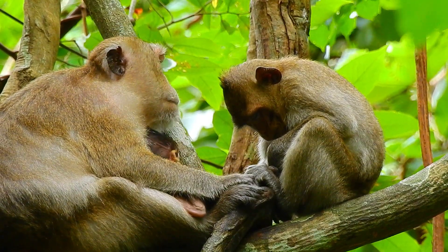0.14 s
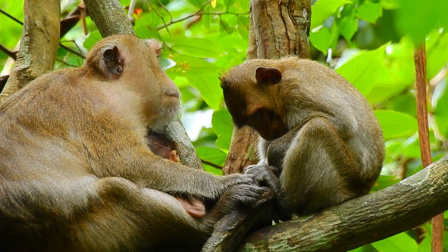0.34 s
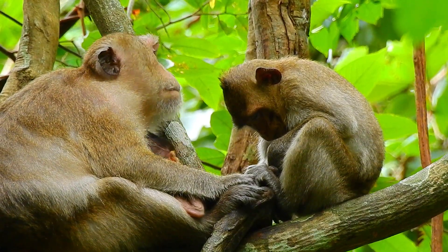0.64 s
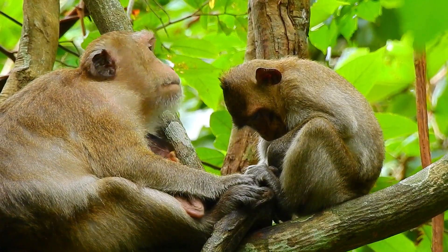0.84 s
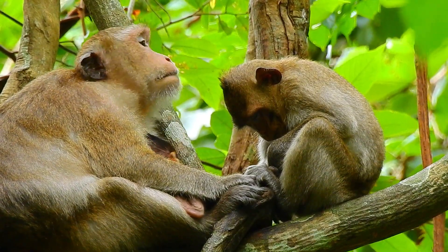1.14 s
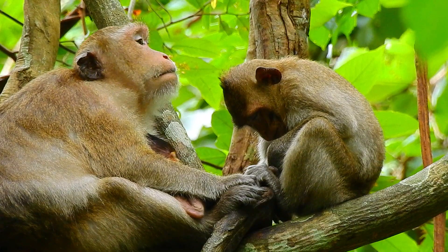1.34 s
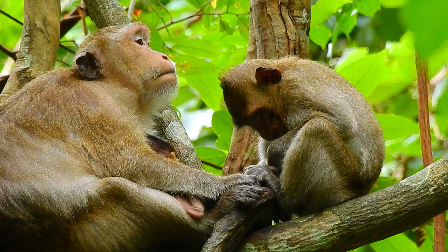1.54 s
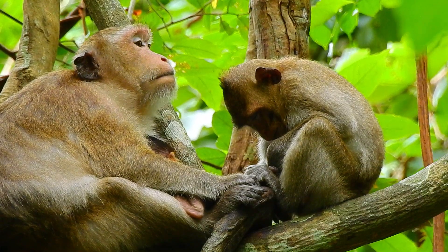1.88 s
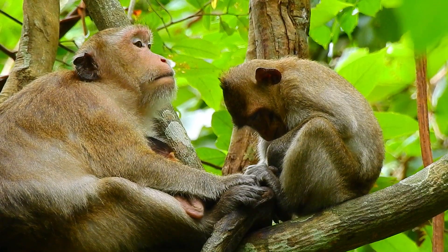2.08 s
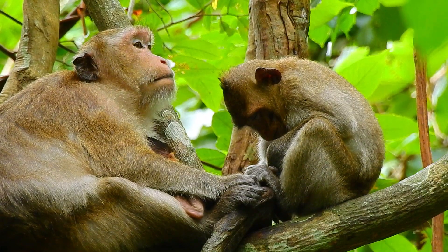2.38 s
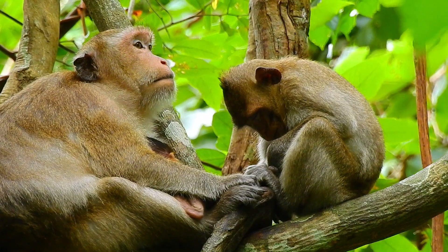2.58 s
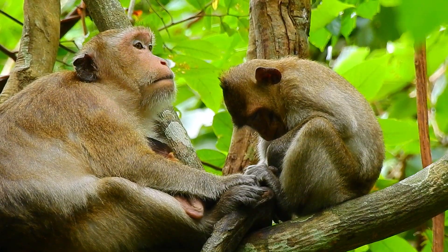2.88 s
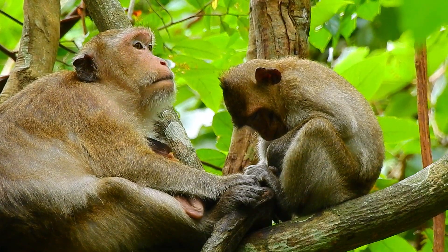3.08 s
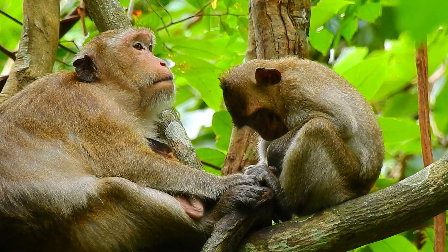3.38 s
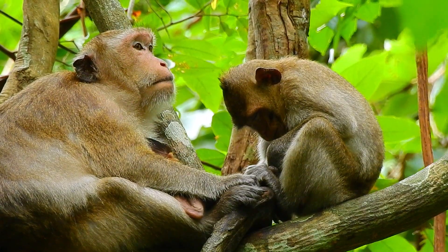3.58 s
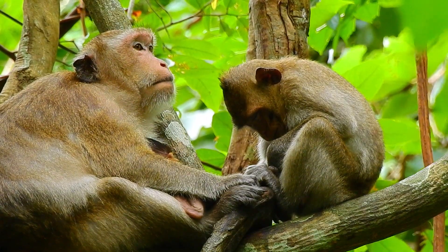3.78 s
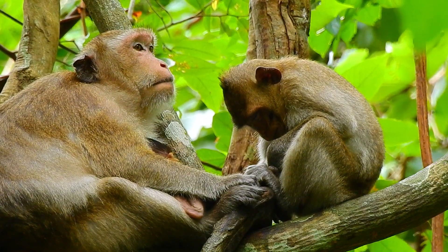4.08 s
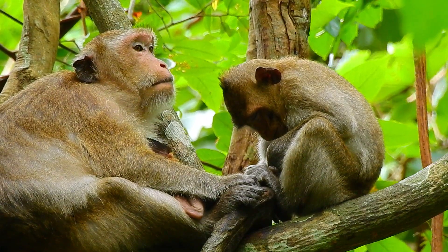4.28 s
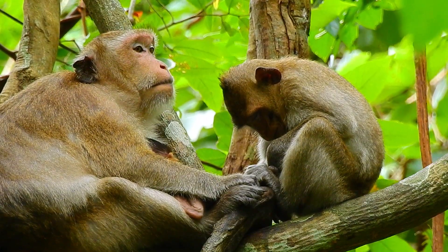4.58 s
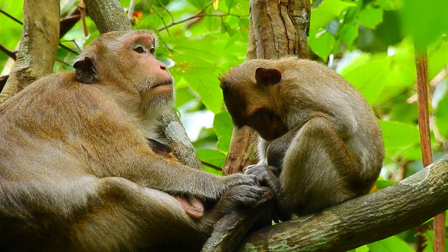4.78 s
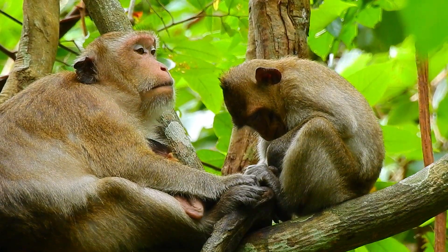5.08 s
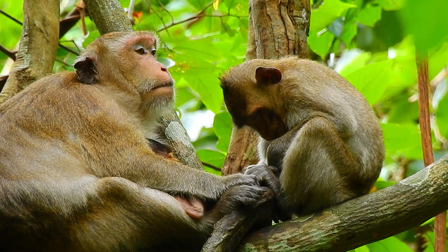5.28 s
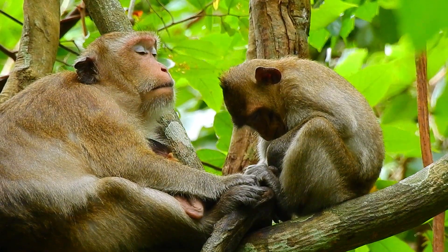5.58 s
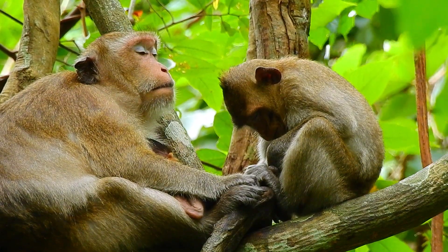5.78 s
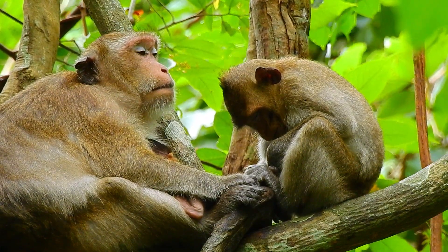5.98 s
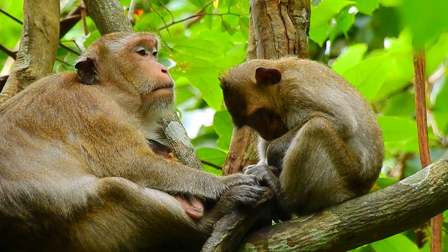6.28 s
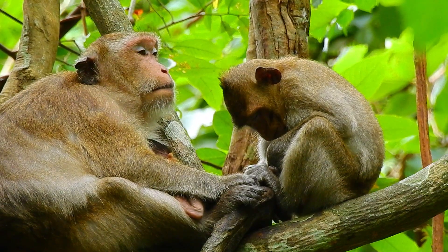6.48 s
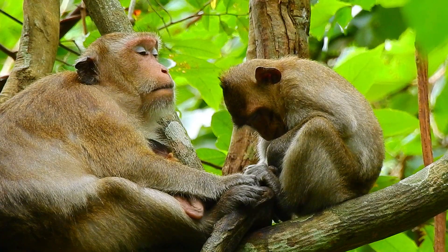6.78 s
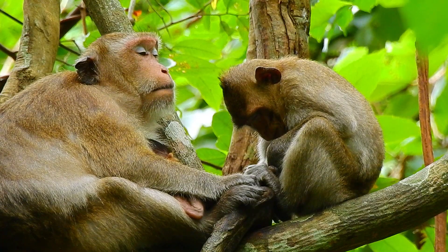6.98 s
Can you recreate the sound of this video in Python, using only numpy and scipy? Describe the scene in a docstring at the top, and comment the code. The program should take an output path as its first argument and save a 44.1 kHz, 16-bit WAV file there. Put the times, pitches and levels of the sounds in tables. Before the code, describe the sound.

Tropical forest ambience outdoors. Distant birds give soft, reverberant sliding whistles from the start, then sharp chips; a nearer bird follows with clear, quick arched notes. High insects drone steadily, a cricket repeats a long-short pulse, and a rough cicada buzz swells early, then cuts off midway. Tiny twig ticks and soft rustling puffs come and go above airy hiss and a low far rumble. Wide stereo microphone, birds slightly left.

```python
"""Birds whistle in a tropical forest: quick arched glides from a nearer one, short dry slides, others deeper in.
Each note is a sine on a gliding pitch path, smeared by noise-built echoes of trunks and leaves into a long tail.
Insects drone as noise in narrow bands, single crickets sing thin tones, a cicada's rough noise swells and stops.
Twigs tick, and soft puffs of noise pass, some rustling, some like insect bursts: both are shaped bursts of noise.
Airy hiss and a low far rumble lie under it all."""
import sys
import numpy as np
from scipy import signal
from scipy.fft import rfft, irfft
from scipy.io import wavfile
from scipy.ndimage import uniform_filter1d

SR = 44100
rng = np.random.default_rng(int(sys.argv[2]) if len(sys.argv) > 2 else 0)


def master(y):
    """Save y as 16-bit WAV."""
    cut = np.clip(np.atleast_2d(y).T, -1, 1)
    pcm = np.round(cut * 32767)  # scale
    wavfile.write(sys.argv[1], SR, pcm.astype(np.int16))


N = 314874   # samples in the scene
ROUND_LENGTH = 5 * 2 ** 16   # samples, a quick transform length
LEFT_RIGHT = np.array([[1], [-1]])   # opposite signs for the two sides


def amp(db):
    """Gain of a level in dB."""
    return 10 ** (np.asarray(db) / 20)


def rms_one(x):
    """Scaled to rms 1, over both sides together."""
    return x / np.sqrt(np.mean(x ** 2) + 1e-20)


def in_time(rows):
    """Columns of a time curve, read at every sample."""
    s, *columns = np.transpose(rows)
    return [np.interp(np.arange(N) / SR, s, c) for c in columns]


def at_hz(points, hz):
    """A spectrum read on a log-frequency axis."""
    point_hz, values = np.array(points).T
    return np.interp(np.log(hz), np.log(point_hz), values)


def drift(corner_hz):
    """Slow random wander of spread 1: noise through two equal low-pass poles, drawn every 40 samples."""
    pole = np.exp(-2 * np.pi * corner_hz * 40 / SR)
    noise = rng.standard_normal(N // 40 + 2002)
    slow = signal.lfilter([1], [1, -2 * pole, pole * pole], noise)[2000:]   # skip the filter's start
    return np.interp(np.arange(N) / 40, np.arange(len(slow)), rms_one(slow))


def widen(shared, opposed, alike):
    """Two sides from a shared and an opposed part; likeness 1 is mono, 0 is independent."""
    return np.sqrt(1 + alike) * shared + np.sqrt(1 - alike) * opposed * LEFT_RIGHT


def resonant(drive, hz, width_hz, lead=0., alike=.5):
    """Spectra of two drives through a doubled resonance: one straight, one scattered, the left leading in phase."""
    bin_hz = np.linspace(0, SR / 2, drive.shape[1])
    shape = 1 / (1 + (2 * (bin_hz - hz) / width_hz) ** 2)
    straight, scattered = drive * shape
    turn = np.exp(.5j * lead * LEFT_RIGHT)
    return rms_one(irfft(widen(straight, scattered, np.clip(alike, 0, 1)) * turn))


# how alike left and right are in the hiss and rumble: (frequency [Hz], likeness [0-1])
SIDE_LIKENESS = [(60, 1), (160, 0.97), (300, 0.54), (700, 0.42), (2500, 0.39), (8000, 0.089), (13000, 0.91)]


def coloured(spectrum):
    """Stereo noise with a given spectrum shape; rms 1."""
    hz = np.maximum(np.fft.rfftfreq(N, 1 / SR), 1)
    mid, side = rfft(rng.standard_normal((2, N))) * amp(at_hz(spectrum, hz))
    alike = np.clip(at_hz(SIDE_LIKENESS, hz), -1, 1)
    return rms_one(irfft(widen(mid, side, alike), N))


# low far rumble: (frequency [Hz], relative level per Hz [dB])
RUMBLE_SPECTRUM = [(12, -60), (20, -38.5), (59, -1.5), (86, 1.5), (144, -4), (197, -12), (253, -26),
                   (300, -34.5), (390, -36), (660, -120)]


def rumble():
    """A low far rumble: steady noise shaped by its spectrum."""
    return amp(-35.5) * coloured(RUMBLE_SPECTRUM)


def patchy(x, patchy_db):
    """Each broad band of a hiss swells and sinks on its own."""
    edges_hz = [0, 250, 550, 1200, 2500, 5500, 11700, SR]
    hz, spectrum = np.fft.rfftfreq(ROUND_LENGTH, 1 / SR), rfft(x, ROUND_LENGTH)
    out = 0
    for low, high in zip(edges_hz, edges_hz[1:]):
        band = irfft(spectrum * ((hz >= low) & (hz < high)))[:, :N]
        out = out + amp(patchy_db * (drift(1.0) + drift(4.9))) * band
    return out


# forest hiss: (frequency [Hz], relative level per Hz [dB])
AIR_SPECTRUM = [(150, -30), (250, -12.5), (420, -17), (800, -18), (1400, -22.5), (2600, -20.5), (3100, -22),
                (3650, -25), (4200, -21.5), (5600, -23), (7500, -24), (9200, -29.5), (11500, -36),
                (12500, -43), (14800, -41.5), (15500, -60)]


def air():
    """Forest hiss: shaped noise whose bands breathe independently."""
    return amp(-49.5) * patchy(coloured(AIR_SPECTRUM), patchy_db=.9)


def singer(white, hz, width_hz, rate, depth, lead, alike):
    """Many far singers blur into throbbing noise in a narrow resonance."""
    throb = 1 + depth * np.sin(2 * np.pi * rate * np.arange(N) / SR + drift(1.5))
    return throb * resonant(white, hz, width_hz, lead, alike)[:, :N]


# steady insects: (centre [Hz], width [Hz], mid level [dB], throb rate [per s], throb depth [0-1],
# level waver [dB], left lead [rad], likeness [0-1])
DRONE_VOICES = [(4855, 138, -52, 10, 0, -1.5, 0, 0.86), (5205, 1300, -52.5, 60, 0, 2.5, 2, 0.23),
                (10820, 100, -67, 9, 0, -5, -2.5, 1), (997, 30, -65.5, 9.1, 0.1, 4, -5.5, 1),
                (804, 63, -66, 27, 0.02, 2.5, 0.14, 1)]


def insect_drone(white):
    """Steady insects: narrow noise bands that waver in level."""
    out = 0
    for hz, width, level_db, rate, depth, waver_db, lead, alike in DRONE_VOICES:
        level = amp(level_db + waver_db * drift(4.1))
        out = out + level * singer(white, hz, width, rate, depth, lead, alike)
    return out


# loose phrases of two crickets that sink at the end: (time [s], low voice level [dB], high voice level [dB])
PHRASE_LEVELS = [(0.0, -55.5, -66), (1.2, -59, -65), (1.9, -53, -64.5), (2.4, -57.5, -63),
                 (3.5, -58.5, -64), (5.3, -60, -64.5), (6.0, -58, -66), (6.4, -65, -72), (7.14, -78, -78)]
# their voices: (centre [Hz], width [Hz], throb rate [per s], throb depth [0-1], left lead [rad])
PHRASE_SINGERS = [(2868, 57, 13, 0.14, 0.48), (11420, 220, 9, 0.03, -1.86)]


def phrasing_crickets(white):
    """Two throbbing noise bands whose levels follow loose phrases."""
    out = 0
    for (hz, width, rate, depth, lead), level_db in zip(PHRASE_SINGERS, in_time(PHRASE_LEVELS)):
        level = amp(level_db - 0.5 * drift(10))
        out = out + level * singer(white, hz, width, rate, depth, lead, 1.0)
    return out


# high crickets, both joining late and the lower one leaving: (time [s], lower level [dB], upper level [dB])
HIGH_CRICKETS = [(0, -92, -89), (.5, -82, -82), (.75, -67, -78), (3.2, -60, -63), (3.749, -64, -65),
                 (4.05, -56, -62), (4.75, -64, -60), (5.2, -98, -59.5), (7.14, -87, -60)]


def high_crickets(white):
    """Two high noise bands that join late, throbbing gently."""
    out = 0
    for hz, level_db, width, lead in zip((7700, 8270), in_time(HIGH_CRICKETS), (80, 170), (.3, 1.3)):
        out = out + amp(level_db) * singer(white, hz, width, 3.9, 0.089, lead, 0.048)
    return out


def insects():
    """The blurred insect chorus: every band rings from the same pair of noises."""
    white = rfft(rng.standard_normal((2, ROUND_LENGTH)))
    return insect_drone(white) + phrasing_crickets(white) + high_crickets(white)


# long and short note of the regular cricket, timed within each bar: (time [s], length [s], level [dB])
CRICKET_BAR = [(0, 0.258, -58), (0.295, 0.1, -58.5)]
BAR_START_S, BAR_S, BAR_HZ = .055, .624, 5762


def regular_cricket():
    """One thin tone, gated in a repeating bar, wavering in level and pitch."""
    in_bar = (np.arange(N) / SR - BAR_START_S) % BAR_S
    gate = 0
    for s, length, db in CRICKET_BAR:
        gate = gate + amp(db) * np.clip(np.minimum(in_bar - s, s + length - in_bar) / 0.014, 0, 1)   # 14 ms edges
    phase = 2 * np.pi * np.cumsum(BAR_HZ + 8 * drift(6.63)) / SR
    return np.sqrt(2) * gate * amp(2.1 * drift(13.0)) * np.sin(phase)


# short chirps of another cricket: (time [s], level [dB] before panning)
CRICKET_CHIRPS = [(4.26, -53), (4.92, -59), (5.07, -59), (5.234, -51), (5.389, -56), (6.27, -60),
                  (6.42, -55), (6.56, -62), (6.695, -55), (6.9, -53)]
CHIRP_HZ, CHIRP_S = 5270, 0.097


def chirping_cricket():
    """One thin tone in rounded chirps, louder on the left."""
    t = np.arange(N) / SR
    swell = sum(amp(db) * np.sin(np.pi * np.clip((t - s) / CHIRP_S, 0, 1)) for s, db in CRICKET_CHIRPS)
    return np.sqrt(2) * swell * np.sin(2 * np.pi * CHIRP_HZ * t) * amp(1.5 * LEFT_RIGHT)


# the cicada's swell and stop: (time [s], level [dB])
CICADA_SWELL = [(1.2, -61), (1.5, -47.5), (1.75, -44), (2.07, -41), (3.16, -41), (3.46, -43), (3.56, -48),
                (3.7, -78)]
CICADA_HZ, CICADA_WIDTH_HZ, CICADA_CLICKS_PER_S = 5140, 620, 150   # the click rate wanders about its mean


def cicada():
    """Membrane clicks, a shallow pulsing in the noise, ring the hollow body."""
    cycle = np.cumsum(CICADA_CLICKS_PER_S * (1 + 0.3 * drift(7.5))) / SR % 1
    bursts = (3.4 + np.exp(-cycle / 1.2)) * rng.standard_normal((2, N))
    return amp(in_time(CICADA_SWELL)[0]) * resonant(rfft(bursts), CICADA_HZ, CICADA_WIDTH_HZ, 0.56, 0.54)


# soft noise puffs: (time [s], length [s], centre [Hz], width [Hz], level [dB] before the puff envelope)
NOISE_PUFFS = [(3.945, 0.55, 6150, 1980, -47), (4.214, 0.69, 4270, 1700, -49),
               (4.205, 0.24, 2300, 700, -46), (4.269, 0.26, 9960, 1210, -57),
               (4.518, 0.28, 9900, 1200, -56), (5.378, 0.072, 10600, 800, -62),
               (6.106, 0.2, 7100, 1500, -59), (5.149, 0.65, 5200, 400, -54.5),
               (6.595, 0.068, 12000, 3000, -56)]


def soft_puffs():
    """Soft puffs of noise that rise fast and fade, some perhaps insect bursts, some rustling."""
    out = np.zeros((2, N))
    for s, length, hz, width, level_db in NOISE_PUFFS:
        i, size = round(s * SR), round(length * SR)
        puff = np.sin(np.pi * (np.arange(size) / size) ** 0.39)
        noise = resonant(rfft(rng.standard_normal((2, 32768))), hz, width, alike=.6)
        out[:, i:i + size] += amp(level_db) * puff * noise[:, :size]
    return out


# twig ticks: (time [s], level [dB] before the snap envelope, centre [Hz])
TWIG_TICKS = [(2.429, -31, 7000), (2.631, -35, 5940), (2.728, -33, 6900), (3.114, -33, 6900),
              (3.459, -35, 7000), (3.819, -60, 7100), (4.531, -27, 6400), (4.704, -28, 6000)]


def ticks():
    """Each tick is a snap of noise a few milliseconds long in a wide resonance."""
    out, t = np.zeros((2, N)), np.arange(1024) / SR
    envelope = np.exp(-t / .0018) * np.minimum(t / .001, 1)
    for s, level_db, hz in TWIG_TICKS:
        i = round(s * SR)
        snap = resonant(rfft(rng.standard_normal((2, len(t)))), hz, 1800, alike=0.11)
        out[:, i:i + len(t)] += amp(level_db) * snap * envelope
    return out


WARBLE_HZ = 37.6   # rate of the pitch shake


def whistle(notes, shakes=None, under_db=-99., edge_s=0.0023):
    """Sine notes on rounded pitch paths of (time, Hz, dB) points, with soft edges."""
    out, waver = np.zeros(N), 1 + .005 * drift(40)   # no pitch is held quite still
    for note, shake in zip(notes, shakes or [0] * len(notes)):
        s, hz, level_db = np.transpose(note)
        i = np.arange(round(s[0] * SR), round(s[-1] * SR))
        t = i / SR
        pitch = uniform_filter1d(np.interp(t, s, hz), size=400, mode="nearest")   # a throat turns corners smoothly
        pitch = pitch * waver[i] * (1 + shake * np.sin(2 * np.pi * WARBLE_HZ * (t - s[0])))
        phase = 2 * np.pi * np.cumsum(pitch) / SR
        edge = np.clip(np.minimum(t - s[0], s[-1] - t) / edge_s, 0, 1)
        tone = np.sin(phase) + amp(under_db) * np.sin(phase / 2)   # partial an octave below
        out[i] += np.sqrt(2) * amp(np.interp(t, s, level_db)) * edge * tone
    return out


def far_glide(s, length, from_hz, to_hz, level_db, swell_db):
    """A straight glide that swells or fades evenly."""
    return [(s, from_hz, level_db), (s + length, to_hz, level_db + swell_db)]


# birds deeper in the trees: (time [s], length [s], from [Hz], to [Hz], level before path gains [dB],
# swell or fade [dB])
DEEP_GLIDES = [(0.254, 0.088, 2690, 2700, -64, -5), (0.805, 0.062, 3177, 2840, -52.5, 6),
               (0.845, 0.14, 2746, 2640, -40, -16), (0.887, 0.04, 2550, 2310, -47, 0),
               (0.948, 0.037, 2090, 2220, -53, 3), (0.991, 0.21, 2450, 2482, -43, -11.5),
               (1.147, .04, 3060, 3150, -58, -3), (1.423, 0.025, 1730, 1780, -45, -2),
               (1.453, 0.17, 1902, 1967, -37, -12.5), (1.736, 0.032, 1496, 1355, -50, -1),
               (1.758, 0.044, 3100, 3870, -50.5, -11), (3.07, 0.041, 3300, 3160, -47.5, -5),
               (3.389, 0.029, 1610, 2125, -34, -12.5), (3.414, 0.23, 2065, 2294, -44, 0),
               (3.843, 0.12, 2040, 2035, -39.5, -14), (4.024, 0.033, 2648, 2642, -35.5, -8),
               (4.053, 0.037, 1980, 1700, -50, 4), (4.2, 0.09, 2703, 2510, -51, 3.5),
               (4.212, 0.019, 2270, 2010, -40.5, 5), (4.311, 0.041, 2910, 3130, -56, -1),
               (4.428, 0.037, 3295, 3204, -38, -4), (4.461, 0.024, 3190, 2766, -38.5, 8.5),
               (4.472, 0.058, 2140, 2270, -42, -5), (4.803, 0.026, 3045, 3070, -35, -1),
               (4.853, 0.075, 3018, 2967, -41, -8), (5.557, 0.109, 966, 900, -45.5, -6.5),
               (5.622, 0.054, 1700, 1904, -50, -1), (5.9, 0.044, 1987, 2154, -52, -3),
               (5.94, 0.072, 2170, 2146, -58.5, 3), (6.026, 0.027, 1980, 1990, -48, 1),
               (6.155, 0.036, 1903, 1895, -50.5, -8), (6.275, 0.1, 2650, 2765, -64, 0),
               (6.354, 0.13, 2450, 2340, -56.5, -14), (6.5, 0.12, 2250, 2170, -59, -15),
               (6.503, 0.16, 2534, 2574, -58, -5)]


def far_glides():
    """Far birds: plain gliding sines with blurred edges."""
    return whistle([far_glide(*row) for row in DEEP_GLIDES], edge_s=.014)


def warble(s, length, from_hz, to_hz, level_db, shake, entry_db):
    """A glide that moves from its entry level to a middle one and sinks."""
    share = .55   # of the note, up to the middle level
    middle_hz = from_hz + share * (to_hz - from_hz)
    return [(s, from_hz, level_db + entry_db), (s + share * length, middle_hz, level_db),
            (s + length, to_hz, level_db - 3.5)]


# warbled notes: (time [s], length [s], from [Hz], to [Hz], middle level before path gains [dB],
# shake [share of pitch], entry level re middle [dB])
WARBLED_NOTES = [(1.425, 0.22, 2536, 2350, -53.5, 0.13, -3), (1.74, 0.078, 2820, 2787, -46.5, 0.042, 13),
                 (1.954, 0.29, 2511, 2019, -41, 0.063, -3.5), (6.029, 0.18, 2203, 2920, -56, 0.06, 3)]


def warbles():
    """Far birds: the pitch shakes about a gliding centre."""
    return whistle([warble(*row) for row in WARBLED_NOTES], [row[5] for row in WARBLED_NOTES], edge_s=.015)


CHIP_DROP_S, CHIP_REBOUND_S, CHIP_FROM_DB, CHIP_TO_DB = 0.01614, 0.04, -12, -20


def chip(s, from_hz, low_hz, rebound_hz, level_db):
    """A steep drop, loudest at the bottom, and a fading rebound."""
    return [(s, from_hz, level_db + CHIP_FROM_DB), (s + CHIP_DROP_S, low_hz, level_db),
            (s + CHIP_DROP_S + CHIP_REBOUND_S, rebound_hz, level_db + CHIP_TO_DB)]


# sharp chips: (time [s], from [Hz], turning point [Hz], end [Hz], level before path gains [dB])
SHARP_CHIPS = [(2.497, 3800, 2970, 3940, -41), (2.785, 3765, 2998, 3240, -40.5),
               (3.043, 3377, 2899, 2877, -40)]


def chips():
    """Sharp chips with a weaker partial an octave below."""
    return whistle([chip(*row) for row in SHARP_CHIPS], under_db=-9.5, edge_s=0.00073)


def slide(s, from_hz, to_hz, glide, stay, level_db, entry_db):
    """A slide to a pitch, held there briefly or for longer."""
    return [(s, from_hz, level_db + entry_db), (s + glide, to_hz, level_db), (s + glide + stay, to_hz, level_db)]


# drier bird notes and short pieces of notes: (time [s], from [Hz], to [Hz], slide [s], stay [s],
# level before path gains [dB], entry level re that [dB])
DRY_SLIDES = [(1.317, 1237, 1150, 0.031, 0.023, -46.5, 1), (1.529, 1220, 1310, 0.025, .001, -50, 0),
              (1.574, 1496, 1510, 0.022, .035, -49, 4), (2.325, 1630, 1151, 0.016, 0.046, -37.5, 2),
              (2.378, 1150, 980, 0.024, .001, -58, 10), (3.316, 2110, 1814, 0.026, 0.0084, -47, 2.5),
              (3.43, 2280, 2520, 0.013, .001, -40, 0), (3.441, 2750, 3280, 0.012, .001, -41, 2),
              (3.451, 3416, 2840, 0.027, 0.004, -34, -1), (3.486, 2887, 3130, 0.0099, .002, -36, 0),
              (3.579, 2120, 1785, 0.021, 0.023, -42, 0), (3.622, 1767, 1913, 0.026, 0.024, -41.5, -2),
              (3.692, 2523, 2416, 0.022, 0.001, -30.5, -8.5), (3.721, 2372, 2150, 0.019, 0.014, -37, -1),
              (3.755, 2236, 2515, 0.012, 0.0075, -36.5, -4), (3.945, 2090, 2090, 0.0032, 0.0125, -36, -6),
              (3.98, 2110, 2048, 0.0037, 0.016, -38.5, 0), (4.017, 2034, 2108, 0.024, 0.023, -39.5, 4),
              (4.237, 1238, 1380, 0.046, .001, -36, -3), (4.488, 1330, 1890, 0.032, .001, -44.5, -2),
              (4.584, 1005, 1270, 0.043, 0.0012, -48.5, 3), (4.822, 3080, 2450, 0.034, .001, -44.5, 9),
              (5.645, 1470, 1200, 0.02, .001, -47, 2.5), (6.21, 3240, 3300, .015, .012, -53.5, -6),
              (6.235, 3320, 2700, .04, 0.018, -56, -7)]


def dry_slides():
    """Drier bird notes and short pieces of notes: a slide, some then held."""
    return whistle([slide(*row) for row in DRY_SLIDES], edge_s=.005)


SAG_HZ_PER_S = 1350   # the pitch sinks while a top is held


def rise(top_s, start_hz, top_hz, hold, level_db, rise_s=0.026, entry_db=-5):
    """Up while swelling, then a sagging hold."""
    return [(top_s - rise_s, start_hz, level_db + entry_db), (top_s, top_hz, level_db),
            (top_s + hold, top_hz - SAG_HZ_PER_S * hold, level_db)]


def arch(top_s, start_hz, top_hz, bottom_hz, rise_s, hold, fall, level_db, entry_db):
    """A rise, then a steep fall."""
    return (rise(top_s, start_hz, top_hz, hold, level_db, rise_s, entry_db)
            + [(top_s + hold + fall, bottom_hz, level_db - 4.5)])


# arched notes: (time of top [s], start [Hz], top [Hz], bottom [Hz], rise [s], hold [s], fall [s],
# level before path gains [dB], entry level re that [dB])
NEAR_ARCHES = [(4.099, 1414, 1610, 1090, 0.027, 0.0011, 0.023, -29, -14),
               (4.299, 1356, 1530, 1167, .022, 0.0064, 0.0374, -29, -8),
               (4.541, 1846, 2094, 993, 0.0295, 0.0048, 0.036, -32, -7),
               (4.65, 1287, 1940, 1370, 0.035, 0.021, 0.013, -33.5, -13),
               (4.905, 1346, 1958, 1353, .03, 0.0143, 0.0125, -30, -14),
               (5.142, 1563, 1947, 1060, 0.036, 0.013, 0.028, -29.5, -22),
               (5.355, 1256, 1840, 1180, 0.031, 0.0013, 0.033, -31, -6)]
# rising notes that end on top: (time of top [s], start [Hz], top [Hz], hold [s], level before path gains [dB])
NEAR_RISES = [(0.124, 1394, 1560, 0.0027, -47.5), (0.445, 1295, 1951, 0.037, -48.5),
              (0.587, 1160, 1942, 0.029, -45), (5.531, 758, 957, 0.017, -44)]


def near_arches():
    """The nearer bird's quick arched and rising glides."""
    return whistle([arch(*row) for row in NEAR_ARCHES] + [rise(*row) for row in NEAR_RISES])


FOREST_T60_S, FOREST_LIKENESS, LEAF_HZ = 1, .76, 1500
EARLY_T60_S, EARLY_DB = 0.17, 5.5   # a stronger, faster-fading early part of the tail


def forest(x):
    """Dense returns from trunks and leaves; the air shifts, so several echo patterns fade into one another."""
    t, out = np.arange(SR) / SR, 0
    onset = 1 - np.exp(-(t / .008) ** 2)   # the nearest trunks answer late
    decay = (amp(-60 * t / FOREST_T60_S) + amp(EARLY_DB - 60 * t / EARLY_T60_S)) * onset
    x = signal.lfilter(*signal.butter(3, LEAF_HZ, "high", fs=SR), x)   # leaves return low tones weakly
    for k in range(3):
        mid, side = rng.standard_normal((2, len(t))) * decay / np.sqrt(2 * np.sum(decay ** 2))
        echoes = widen(mid, side, FOREST_LIKENESS)
        share = np.cos(2 * np.pi * (17 * np.arange(N) / SR + k / 3)) * np.sqrt(2 / 3)
        out = out + signal.fftconvolve((x * share)[None], echoes, axes=1)[:, :N]
    return out


def birds():
    """All bird voices, mixed from a straight path and the returns of the trees."""
    arched, sliding, chipping = near_arches(), dry_slides(), chips()
    far = far_glides() + warbles()
    arches_and_slides = amp(-1.5) * arched + amp(.5) * sliding
    light_flutter = amp(2 * drift(45))
    far_flutter = amp(4.5 * drift(30))   # moving air breaks up the straight path from far away
    straight = light_flutter * arches_and_slides + amp(-2.5) * far_flutter * far + amp(.65) * chipping
    returned = forest(amp(2.5) * arched + amp(-1) * sliding + amp(5.5) * far + amp(8) * chipping)
    return (straight + returned) * amp(1.1 / 2 * LEFT_RIGHT)   # 1.1 dB louder on the left


def scene():
    """Birds, insects and small sounds over hiss and rumble."""
    floor = rumble() + air()
    singers = insects() + regular_cricket() + chirping_cricket() + cicada()
    return floor + singers + soft_puffs() + ticks() + birds()


def record(dry):
    """The left side is made a little louder; the top is cut steeply above 15.6 kHz."""
    top_cut = signal.ellip(14, .5, 90, 15600, fs=SR, output="sos")
    return signal.sosfilt(top_cut, dry * amp(.2 * LEFT_RIGHT))


dry = scene()
out = record(dry)
master(out)
```